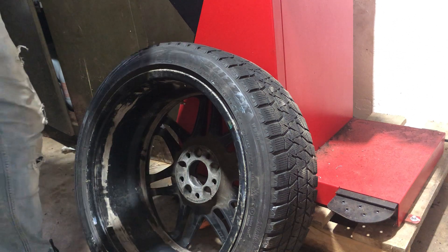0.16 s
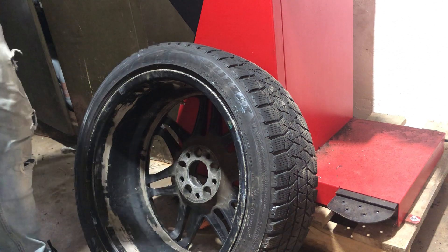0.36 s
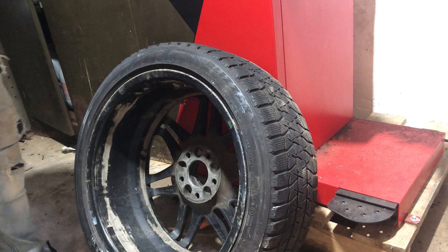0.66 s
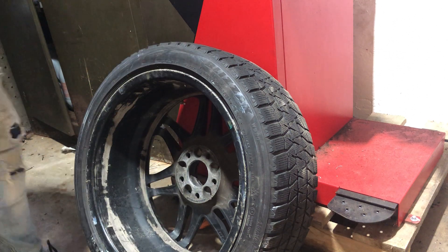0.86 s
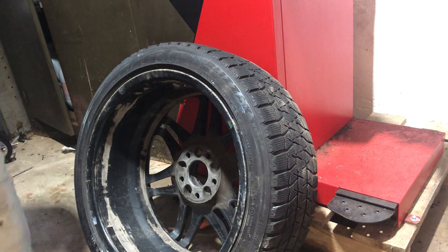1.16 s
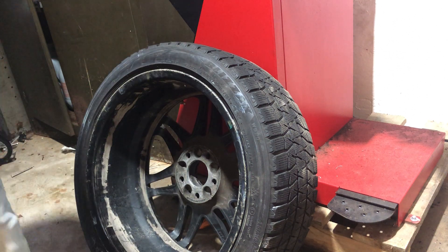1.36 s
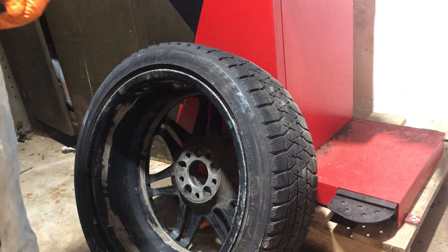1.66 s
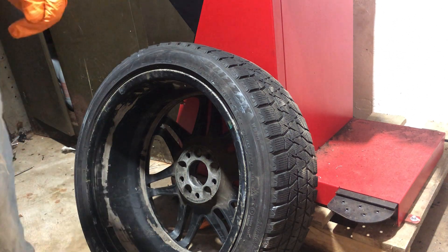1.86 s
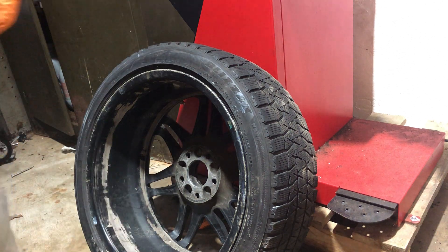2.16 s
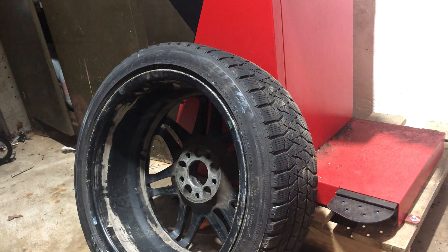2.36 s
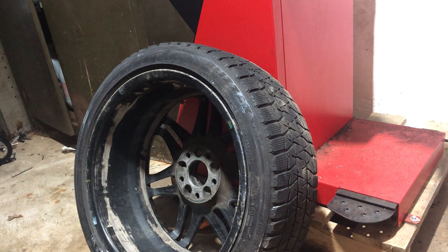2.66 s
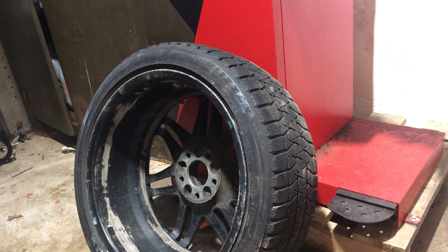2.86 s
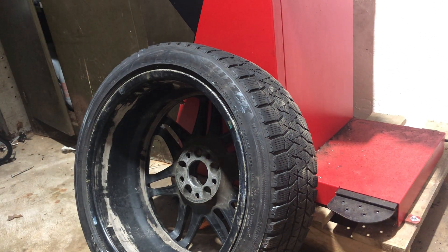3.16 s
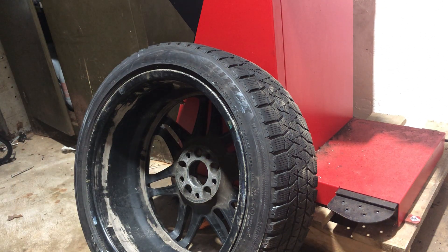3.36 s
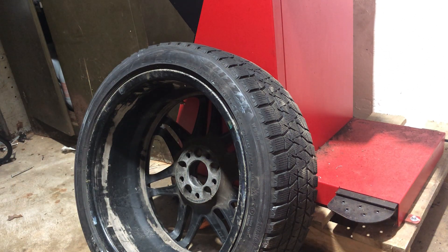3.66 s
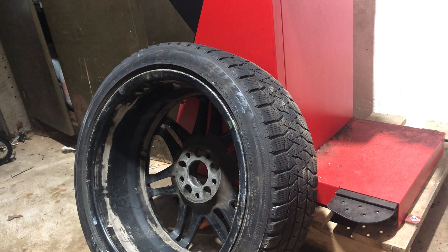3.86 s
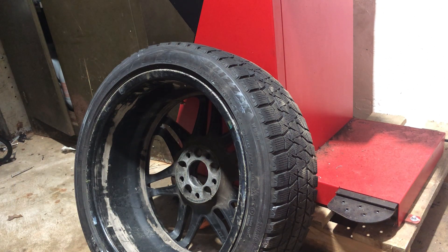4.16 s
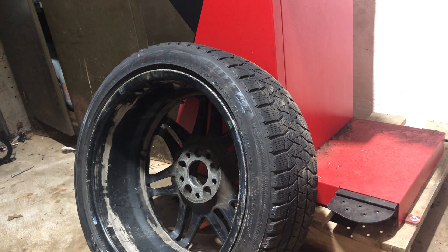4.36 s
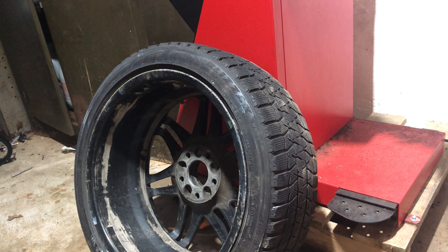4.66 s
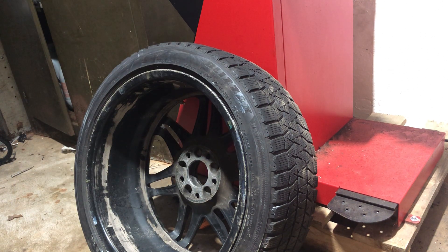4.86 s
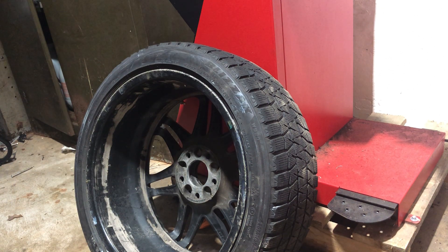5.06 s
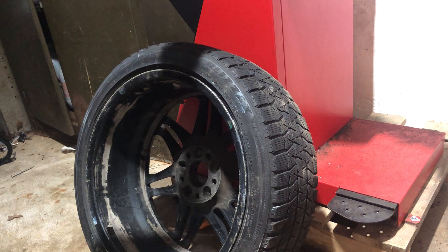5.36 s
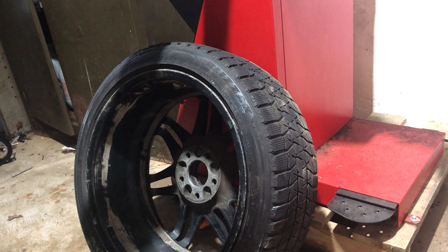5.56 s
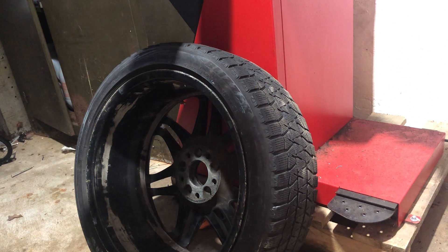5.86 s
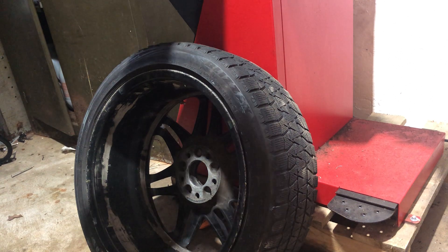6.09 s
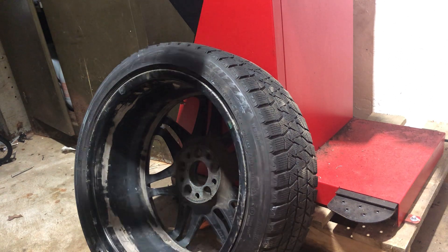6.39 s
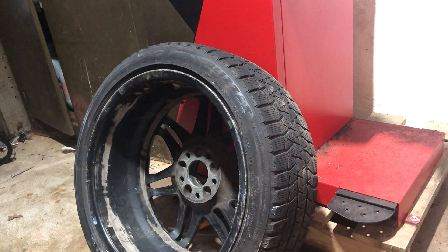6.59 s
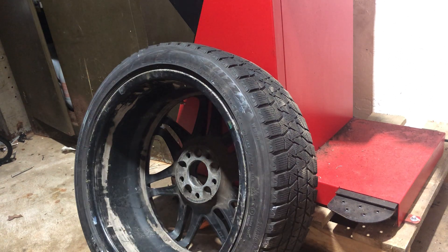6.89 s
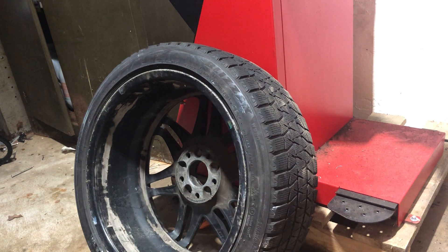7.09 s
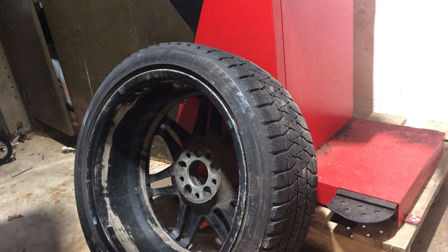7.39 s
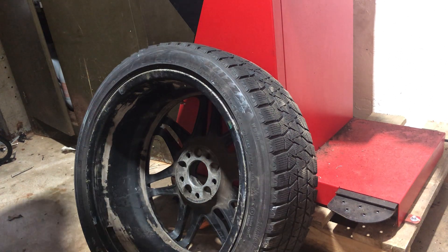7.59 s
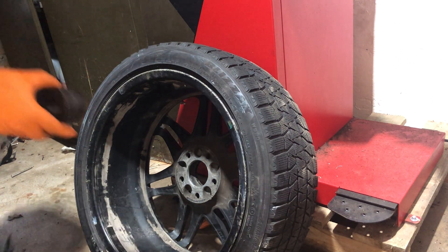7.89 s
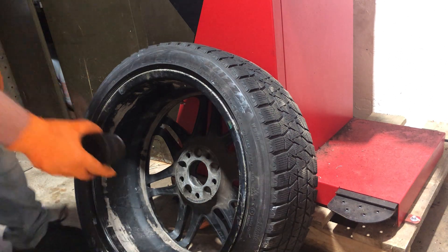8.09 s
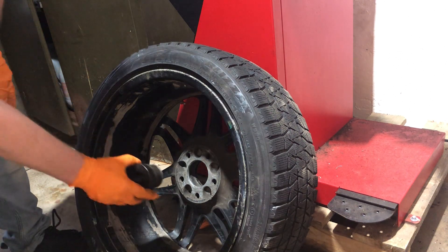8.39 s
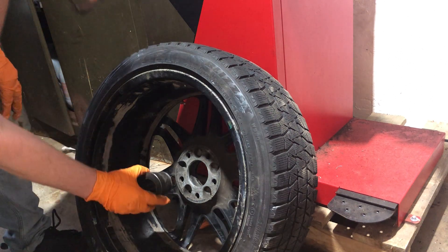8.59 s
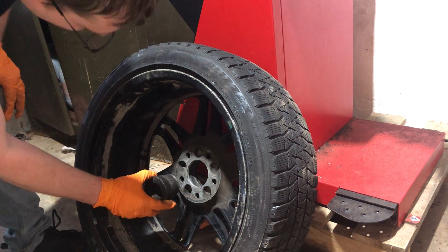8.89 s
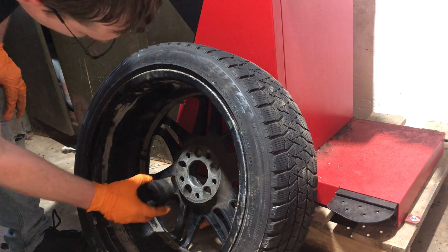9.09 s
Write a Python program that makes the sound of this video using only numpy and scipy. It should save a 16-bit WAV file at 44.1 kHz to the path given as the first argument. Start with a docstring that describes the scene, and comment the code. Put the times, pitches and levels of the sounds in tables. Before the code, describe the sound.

Someone shifts about on a gritty workshop floor, soles scraping and clothes rustling, while handled things knock lightly over faint hiss.

```python
"""Shoes shuffle on gritty concrete in a small workshop: soles scuff, crack grains and groan as they twist.
Clothes rustle, light rubs squeak, heels and handled things knock. An object rocks on a hollow board, soft bumps
make the room's low mode boom, and a last hard scrape comes close by. Under it all lie a quiet room rumble, a
low drone and microphone hiss."""
import sys
import numpy as np
from scipy import signal
from scipy.fft import rfft, irfft
from scipy.io import wavfile
from scipy.ndimage import uniform_filter1d

SR = 44100
rng = np.random.default_rng(int(sys.argv[2]) if len(sys.argv) > 2 else 0)


def pcm_store(signal):
    """Save signal as 16-bit PCM."""
    levels = np.round(np.clip(np.atleast_2d(signal), -1, 1) * 32767)
    wavfile.write(sys.argv[1], SR, levels.astype(np.int16).T)


N = 407464
TIME = np.arange(N) / SR
EVENT_TIME = np.arange(2 ** 15) / SR


def undb(db):
    return 10 ** (np.asarray(db) / 20)


def unit(x):
    """Scale to rms 1."""
    return x / np.sqrt(np.mean(x ** 2))


def add(out, start, x):
    """Mix x in from start, in seconds."""
    i = max(int(start * SR), 0)
    out[i:i + len(x)] += x[:N - i]


def edge(x, hz, kind, order=2):
    """Low-pass or high-pass."""
    return signal.sosfilt(signal.butter(order, min(hz, .45 * SR), kind, fs=SR, output="sos"), x)


def bandpass(x, low_hz, top_hz, order=2):
    """Roll off both ends."""
    return edge(edge(x, low_hz, "high", order), top_hz, "low", order)


def resonate(x, hz, width_hz):
    """One resonance, gain 1 at its centre."""
    return signal.lfilter(*signal.iirpeak(hz, hz / width_hz, fs=SR), x)


def whistle(size, hz, width_hz):
    """Noise narrowed to a breathy pitch by two passes through a resonance."""
    noise = rng.standard_normal(size)
    return unit(resonate(resonate(noise, hz, width_hz), hz, width_hz))


def equalise(x, curve, tilt_db=0, pivot_hz=2500):
    """Apply an EQ curve, plus a tilt per octave above the pivot."""
    octave = np.log2(np.maximum(np.fft.rfftfreq(len(x), 1 / SR), 1))
    hz, db = np.transpose(curve)
    gain_db = np.interp(octave, np.log2(hz), db) + tilt_db * np.maximum(octave - np.log2(pivot_hz), 0)
    return irfft(rfft(x) * undb(gain_db), len(x))


def wander(rate_hz, size):
    """Smooth random modulation with a spread near 1."""
    step = int(SR / rate_hz)
    return uniform_filter1d(np.repeat(rng.standard_normal(size // step + 1), step), step)[:size]


# EQ of the still air: (frequency [Hz], gain [dB])
RUMBLE_EQ = [(20, -29), (45, -7.5), (75, -5.5), (115, -5), (150, -7), (300, -10), (450, -12), (720, -13.5),
             (1300, -18), (1900, -17), (2600, -20.5), (4000, -26.5), (6000, -64)]
# fader rides of the rumble and the drone: (time [s], level before trim [dB])
RUMBLE_FADER = [(0.0, -78.5), (0.61, -74), (0.92, -79.5), (1.43, -72.5), (1.71, -77), (5.48, -75.5),
                (5.81, -80), (6.18, -74), (9.2, -80)]
DRONE_FADER = [(0.0, -90), (0.31, -75), (1.42, -79), (2.1, -70), (2.94, -69), (3.55, -81), (5.8, -75)]


def room_tone(rumble_trim_db=9.5, waver_db=1, drone_trim_db=-3, drone_hz=114):
    """The bed: still air rumbles and wavers around a low, narrow drone."""
    rumble_db = np.interp(TIME, *np.transpose(RUMBLE_FADER)) + waver_db * wander(4.5, N)
    drone_db = np.interp(TIME, *np.transpose(DRONE_FADER))
    rumble = unit(equalise(rng.standard_normal(N), RUMBLE_EQ))
    drone = unit(resonate(rng.standard_normal(N), drone_hz, width_hz=14))
    return rumble * undb(rumble_db + rumble_trim_db) + drone * undb(drone_db + drone_trim_db)


# EQ of the hiss: (frequency [Hz], gain [dB])
HISS_EQ = [(2500, -18), (3200, -8), (3750, 0), (4150, 0), (4700, -4), (5700, -5), (6800, -4), (8300, -9),
           (9700, -10), (10400, -4), (11300, -9.5), (12800, -12), (15500, -10)]
# fader ride of its whistling band: (time [s], level before trim [dB])
WHISTLE_FADER = [(0.0, -66.5), (0.69, -69.5), (2.12, -80), (3.05, -63.5), (7.22, -72), (7.94, -70.5),
                 (9.2, -71)]


def microphone_hiss(hiss_db=-65.5, whistle_trim_db=-2.5):
    """Smooth microphone hiss, with one whistling band that swells and sinks."""
    hiss = unit(edge(equalise(rng.standard_normal(N), HISS_EQ), 2300, "high"))
    whistle_db = np.interp(TIME, *np.transpose(WHISTLE_FADER)) + whistle_trim_db
    return undb(hiss_db) * hiss + undb(whistle_db) * whistle(N, hz=5700, width_hz=1150)


def early_echoes(x, count=4, gain=0.13, spread_s=0.007):
    """The floor and things nearby throw back faint echoes, different at every spot."""
    out = x.copy()
    for lag in 15 + (rng.random(count) * spread_s * SR).astype(int):
        out[lag:] += gain * x[:-lag]
    return out


# EQ of crushed grit: (frequency [Hz], gain [dB])
GRIT_EQ = [(150, -5.5), (700, 2), (1500, 0), (2800, 1.5), (5000, -1), (6800, -4), (9000, -7.5),
           (12500, -13), (15500, -15)]


def slide(pressure, low_hz, hollow_hz, hollow_db, tilt_db=0, grains_per_s=7000, grain_db=2.5):
    """A sliding surface crushes a stream of tiny grains; the gap under it rings hollow."""
    size = len(pressure)
    strengths = undb(grain_db * np.minimum(rng.exponential(size=size), 5))
    grains = (rng.random(size) < grains_per_s / SR) * strengths * rng.choice([-1, 1], size)
    rub = 0.58 * rng.standard_normal(size)
    grit = equalise(early_echoes(unit(grains) + rub), GRIT_EQ, tilt_db)
    hollow = undb(hollow_db) * resonate(grit, hollow_hz, width_hz=0.32 * hollow_hz)
    judder = undb(2.5 * wander(164, size))  # the surface sticks and slips
    return pressure * unit(edge(grit + hollow, low_hz, "high", order=3) * judder)


# cloth moves: (time [s], length [s], level [dB], treble tilt [dB/octave])
CLOTH_MOVES = [(0.177, 0.15, -58.5, 3), (0.418, 0.093, -63.5, -2), (1.428, 0.33, -58, 1.5),
               (3.28, .2, -55.5, -3), (3.978, 0.13, -60.5, 0), (5.2, 0.16, -67.5, -2),
               (6.792, 0.19, -62.5, 1.5), (7.238, .21, -58, 2), (8.188, 0.24, -59, 1)]


def cloth_rustles():
    """Cloth slides over cloth, swelling and ebbing with each movement."""
    out = np.zeros(N)
    for start, length, db, tilt_db in CLOTH_MOVES:
        swell = np.sin(np.pi * np.minimum(EVENT_TIME / length, 1))
        rustle = slide(swell, low_hz=550, hollow_hz=1260, hollow_db=-17, tilt_db=tilt_db)
        add(out, start, undb(db) * rustle)
    return out


# grains cracking underfoot: (time [s], peak level [dB], low cut [Hz])
GRIT_CRACKS = [(.2185, -36.5, 2500), (.924, -30, 3970), (.9413, -24.5, 3200), (0.9429, -21, 3480),
               (1.453, -41.5, 2000), (4.118, -28, 1790), (6.7631, -23.5, 1800), (7.3937, -32, 2500),
               (7.409, -34, 2500)]


def grit_cracks(fade_s=0.00055, top_hz=7000):
    """Single larger grains burst under a sole with a sharp tick."""
    out = np.zeros(N)
    for start, db, low_hz in GRIT_CRACKS:
        burst = rng.standard_normal(len(EVENT_TIME)) * np.exp(-EVENT_TIME / fade_s)
        tick = bandpass(burst, low_hz, top_hz)
        add(out, start, undb(db) * tick / np.abs(tick).max())
    return out


def press(attack_s, hold_s, release_s):
    """Foot pressure rises, holds and dies away."""
    released_s = np.maximum(EVENT_TIME - attack_s - hold_s, 0)
    return np.minimum(EVENT_TIME / attack_s, 1) * np.exp(-released_s / release_s)


def coarse_grit(ticks_per_s=230, spread_db=0.5):
    """Scattered ticks of coarser grains among the fine ones."""
    size = len(EVENT_TIME)
    ticks = (rng.random(size) < ticks_per_s / SR) * undb(spread_db * rng.standard_normal(size))
    return unit(bandpass(early_echoes(ticks), low_hz=3000, top_hz=11000))


# scuffs and scrapes: (time [s], attack [s], hold [s], level [dB], low cut [Hz], hollow ring [Hz],
# treble tilt [dB/octave])
SHOE_SCUFFS = [ (0.584, 0.021, 0.073, -42, 746, 2900, 2), (0.911, 0.024, .057, -41, 198, 2000, 1.6),
               (1.335, 0.011, 0.048, -51.5, 560, 950, 0), (1.64, 0.023, 0.011, -49.5, 700, 1700, 2.5),
               (2.311, 0.16, .008, -47.5, 700, 5000, 4.5), (2.836, 0.0024, 0.045, -44, 650, 1700, -1.5),
               (3.078, 0.0014, 0.027, -43, 300, 2920, 1.1), (3.886, 0.025, .003, -54.5, 600, 1060, 2),
               (4.087, 0.029, .042, -40.5, 270, 1930, 2), (4.572, .012, .025, -59, 600, 960, 2.5),
               (5.526, .006, 0.058, -53, 560, 1130, 1), (6.338, 0.027, .009, -52, 280, 2900, 0),
               (6.435, 0.02, 0.017, -41, 300, 4560, -0.2), (6.67, .052, .005, -49, 1100, 2800, 2.5),
               (6.746, 0.013, 0.008, -48, 750, 1100, -.5), (7.386, 0.025, 0.021, -49.5, 1250, 3500, 1.5),
               (7.701, 0.022, 0.021, -29, 600, 5860, -0.6), (7.914, 0.0041, 0.022, -49.5, 1100, 6000, 4),
               (8.13, .002, 0.018, -50, 500, 3120, -.5)]


def shoe_scuffs():
    """Soles drag over gritty concrete; the brighter the scuff, the louder its coarse crackle."""
    out = np.zeros(N)
    for start, attack, hold, db, low_hz, hollow_hz, tilt_db in SHOE_SCUFFS:
        release = 0.012 + 0.37 * attack  # a foot that lands slowly lifts slowly
        pressure = press(attack, hold, release)
        crackle = undb(-19 + 3 * tilt_db) * pressure * coarse_grit()
        scrape = slide(pressure, low_hz, hollow_hz, hollow_db=-7.5, tilt_db=tilt_db)
        add(out, start, undb(db) * (scrape + crackle))
    return out


# thin squeaks and whistling rubs: (time [s], length [s], pitch [Hz], width [Hz], level [dB])
FRICTION_SQUEAKS = [(.77, 0.28, 8470, 400, -64), (.825, 0.05, 6520, 90, -59), (.85, 0.088, 6040, 900, -60),
                    (4.274, 0.6, 1915, 200, -70.5), (4.298, 0.72, 2260, 200, -74),
                    (6.835, 0.22, 1920, 130, -70.5)]


def squeaks():
    """Light friction sings briefly in narrow, high resonances."""
    out = np.zeros(N)
    for start, length, hz, width_hz, db in FRICTION_SQUEAKS:
        swell = np.sqrt(np.hanning(int(length * SR)))
        add(out, start, undb(db) * swell * whistle(len(swell), hz, width_hz))
    return out


def damped_ring(hz, octaves, fade_s, order):
    """A dense, quickly dying ring around one pitch; its energy depends only on the fade."""
    half_band = 2 ** (octaves / 2)
    decay = np.exp(-EVENT_TIME / fade_s)
    ring = decay * bandpass(rng.standard_normal(len(decay)), hz / half_band, hz * half_band, order)
    return ring * np.linalg.norm(decay) / np.linalg.norm(ring)


# heels and handled things: (time [s], thud level [dB], thud pitch [Hz], clack level [dB],
# clack pitch [Hz], clack fade [s])
KNOCK_HITS = [(2.291, -58.5, 220, -62, 800, 0.03), (2.825, -54, 200, -46.5, 1600, .02),
              (2.842, -47.5, 175, -39.5, 1190, 0.034), (2.904, -47, 187, -43, 1270, 0.018),
              (3.221, -73, 250, -56, 2200, 0.0092), (3.8616, -69, 300, -45, 1620, 0.0064),
              (4.026, -60, 300, -56, 1490, 0.0071), (4.09, -54, 268, -44, 1700, 0.0061),
              (5.128, -54, 170, -51.5, 825, 0.0067), (6.008, -53, 242, -56, 1630, 0.031),
              (6.112, -52.5, 215, -58, 860, .035), (6.438, -56, 300, -47.5, 1700, .009),
              (7.152, -52.5, 245, -52.5, 1180, 0.019), (7.736, -41, 372, -42, 620, 0.026),
              (8.128, -45, 454, -51.5, 2860, 0.026)]


def knocks():
    """Short blows on heavily damped things: the mass thuds, the surface clacks."""
    out = np.zeros(N)
    for start, thud_db, thud_hz, clack_db, clack_hz, clack_fade in KNOCK_HITS:
        thud = damped_ring(thud_hz, octaves=1.2, fade_s=0.019, order=4)
        clack = damped_ring(clack_hz, octaves=1.3, fade_s=clack_fade, order=3)
        add(out, start, undb(thud_db) * thud + undb(clack_db) * clack)
    return out


def ring_out(t, t60):
    """A decay that falls 60 dB in t60 seconds."""
    return np.exp(-np.log(1000) * t / t60)


def mode(hz, t60, push_s):
    """A mode builds up while it is pushed and then rings out."""
    envelope = np.minimum(EVENT_TIME / push_s, 1) * ring_out(np.maximum(EVENT_TIME - push_s, 0), t60)
    return envelope * np.sin(2 * np.pi * hz * EVENT_TIME)


# hits on the board: (time [s], level [dB], contact roll-off [Hz], push [s])
BOARD_HITS = [(2.839, -42.5, 300, 0.011), (2.903, -41.5, 1500, 0.0067), (2.919, -35, 380, 0.01),
              (3.009, -43, 200, 0.012)]
# the board's modes: (pitch [Hz], gain [dB], t60 [s])
BOARD_MODES = [(146.5, -7.5, 0.25), (195, -4, 0.14), (213.9, -1, 0.36), (542.3, 2, 0.26), (581, -8.5, 0.32),
               (640, -8.5, 0.3), (840, -15, 0.34)]


def hollow_board():
    """An object lands and rocks on a hollow board; soft contact leaves the upper modes quiet."""
    out = np.zeros(N)
    for start, db, contact_hz, push in BOARD_HITS:
        for hz, mode_db, t60 in BOARD_MODES:
            roll_off = 1 / np.hypot(1, (hz / contact_hz) ** 2)
            add(out, start, undb(db + mode_db) * roll_off * mode(hz, t60, push))
    return out


# soft bumps that set the room's low mode booming: (time [s], level [dB], push [s], pitch [Hz])
BOOM_BUMPS = [(2.85, -48, 0.027, 101.6), (5.918, -52.5, 0.014, 123), (6.02, -52.5, 0.014, 105),
              (6.139, -44.5, 0.019, 112)]


def room_booms(t60_s=0.4):
    """A slow push sets the room's lowest mode swinging."""
    out = np.zeros(N)
    for start, db, push, hz in BOOM_BUMPS:
        add(out, start, undb(db) * mode(hz, t60_s, push))
    return out


# groans of twisting soles: (time [s], level [dB], pitch [Hz])
SOLE_TWISTS = [(5.333, -47.5, 880), (5.416, -55.5, 1190), (5.52, -49.5, 1130), (7.716, -37, 830),
               (7.914, -51.5, 1150)]


def sole_twists():
    """A rubber sole turns on the spot and groans in one strong resonance above the grit."""
    out = np.zeros(N)
    pressure = press(attack_s=0.026, hold_s=0.011, release_s=0.013)
    for start, db, hz in SOLE_TWISTS:
        add(out, start, undb(db) * slide(pressure, low_hz=0.49 * hz, hollow_hz=hz, hollow_db=18.5))
    return out


def workshop_reverb(x, wet_db=-6, crossover_hz=4500, predelay_s=0.0013, build_s=0.013):
    """Direct sound and dense echoes from near walls; the treble dies first."""
    noise = rng.standard_normal(len(EVENT_TIME))
    lows = edge(noise, crossover_hz, "low", order=1)
    tail = lows * ring_out(EVENT_TIME, t60=0.35) + (noise - lows) * ring_out(EVENT_TIME, t60=0.22)
    tail *= np.clip((EVENT_TIME - predelay_s) / build_s, 0, 1)
    wet = signal.fftconvolve(x, tail / np.linalg.norm(tail))[:N]
    return (x + undb(wet_db) * wet) / np.hypot(1, undb(wet_db))


def scene():
    """Mono mix: feet, cloth and knocks feed the reverb; board, booms and bed stay dry."""
    foley = shoe_scuffs() + sole_twists() + cloth_rustles() + grit_cracks() + knocks() + squeaks()
    mix = workshop_reverb(foley) + hollow_board() + room_booms() + room_tone() + microphone_hiss()
    return mix[None]


def record(dry, top_hz=15900):
    """A steep high cut on the whole mix."""
    return signal.sosfilt(signal.ellip(10, .2, 60, top_hz, fs=SR, output="sos"), dry)


dry = scene()
out = record(dry)
pcm_store(out)
```